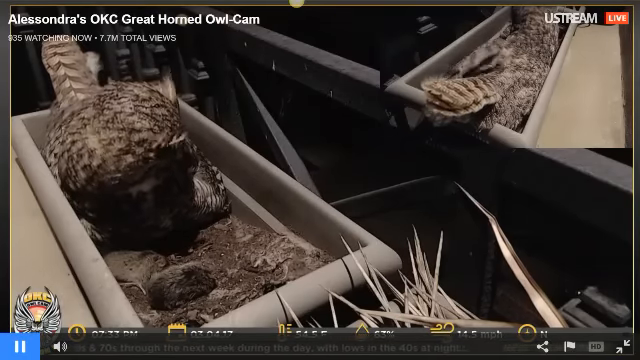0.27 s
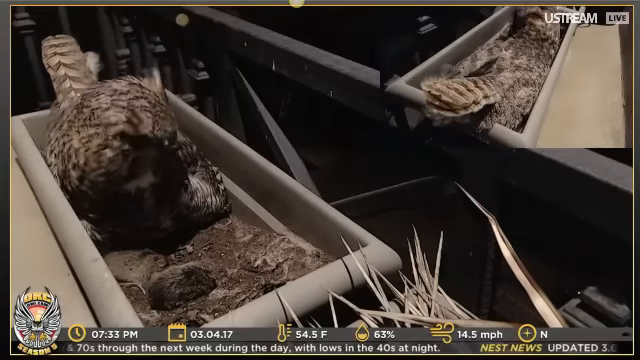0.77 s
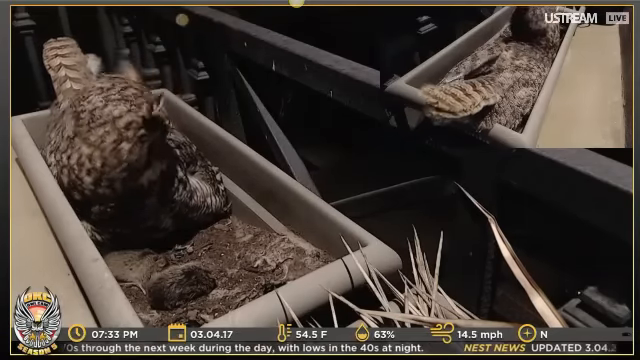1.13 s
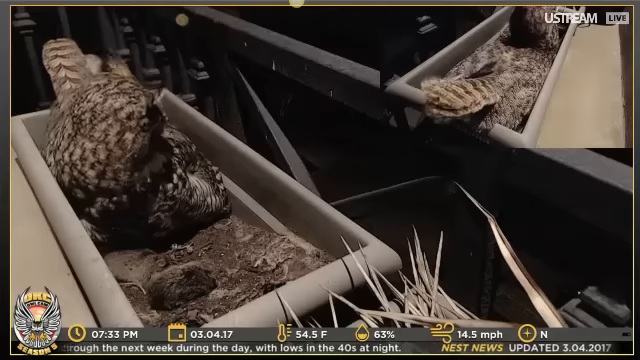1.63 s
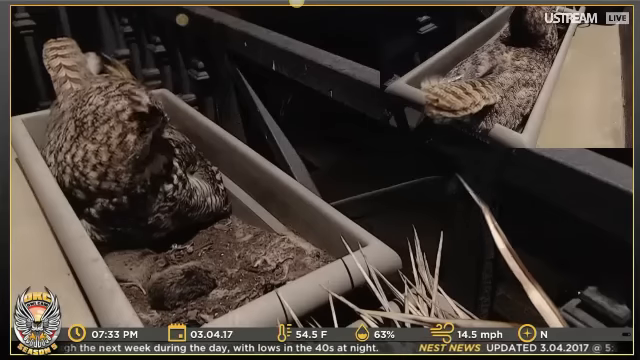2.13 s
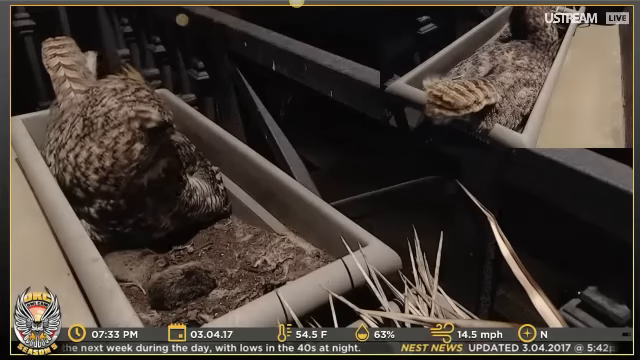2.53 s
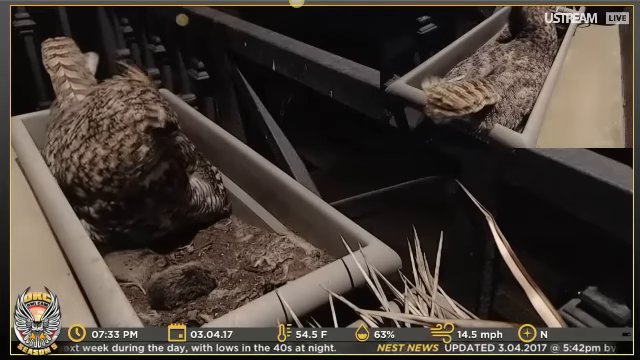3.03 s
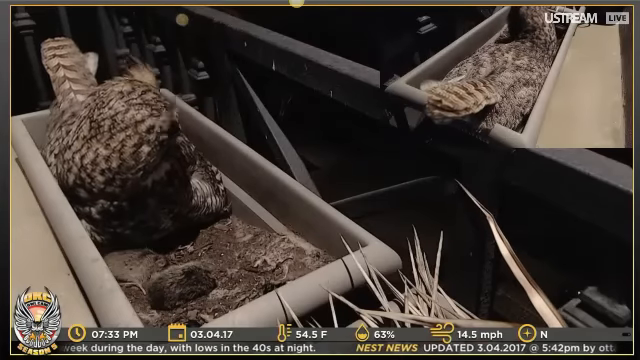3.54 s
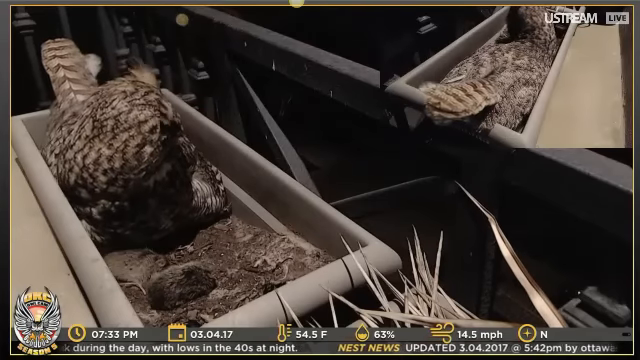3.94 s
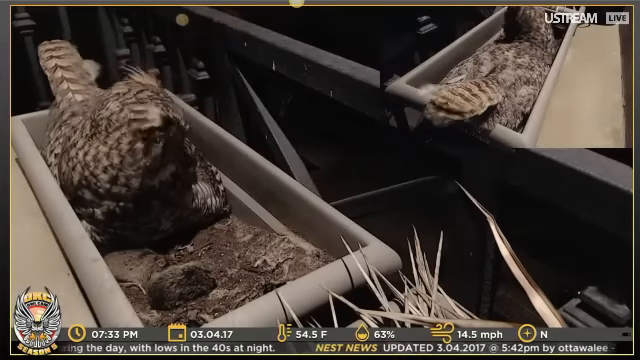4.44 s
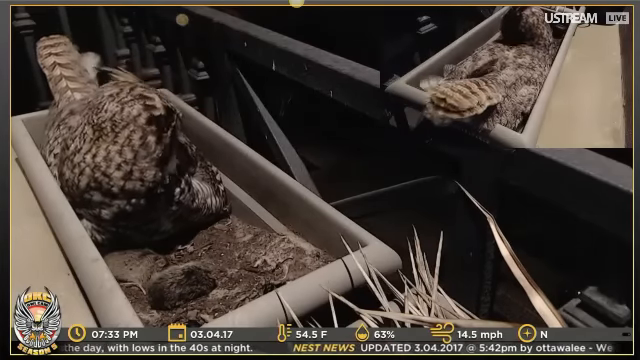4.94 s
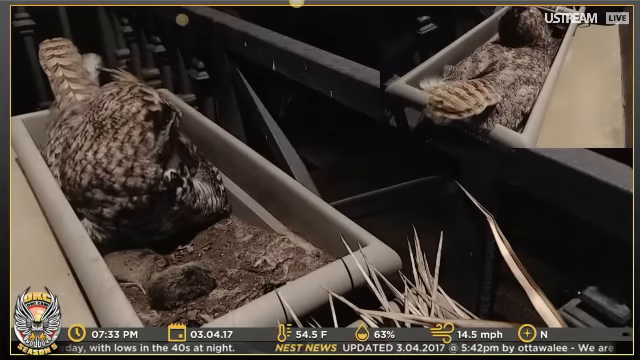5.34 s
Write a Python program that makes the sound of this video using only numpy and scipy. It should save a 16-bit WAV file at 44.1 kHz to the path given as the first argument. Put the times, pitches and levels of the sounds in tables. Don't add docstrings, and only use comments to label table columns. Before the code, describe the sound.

At night a large owl in a nest box gives three smooth low hoots, the first already sounding at the start. A faint far metallic squeal rings once after it. Dry litter snaps and scrapes after the third hoot, then short, throaty gulped hoots follow. Distant traffic rumbles and hisses throughout, and one car passes slightly nearer. Close stereo microphones give a thin, band-limited sound.

```python
import sys
import numpy as np
from scipy import signal
from scipy.fft import rfft, irfft, next_fast_len
from scipy.io import wavfile
from scipy.ndimage import uniform_filter1d

SR = 44100
rng = np.random.default_rng(int(sys.argv[2]) if len(sys.argv) > 2 else 0)


def store_wav(level_fs):
    pcm = np.round(np.clip(np.atleast_2d(level_fs), -1, 1) * 32767)
    wavfile.write(sys.argv[1], SR, pcm.T.astype(np.int16))


def voltage_ratio(decibels):
    exponent = np.asarray(decibels, float) / 20
    return 10 ** exponent


N = 246519


def rms_one(x):
    return x / np.sqrt(np.mean(x ** 2) + 1e-20)


def in_time(rows):
    s, *columns = np.transpose(rows)
    return [np.interp(np.arange(N) / SR, s, column) for column in columns]


def at_hz(points, hz):
    point_hz, value = np.transpose(points)
    return np.interp(np.log(hz + 1), np.log(point_hz), value)


def drift(rate_hz):
    r = np.exp(-80 * np.pi * rate_hz / SR)
    seed = rng.standard_normal(N // 40 + 2002)
    slow = signal.lfilter([1], [1, -2 * r, r * r], seed)[2000:]
    return np.interp(np.arange(N) / 40, np.arange(len(slow)), rms_one(slow - slow.mean()))


def resonate(x, hz, width_hz):
    r = np.exp(-np.pi * width_hz / SR)
    ring = [1, -2 * r * np.cos(2 * np.pi * hz / SR), r * r]
    return signal.lfilter(np.array([1, 0, -1]) * (1 - r * r) / 2, ring, x)


def narrow_noise(hz, width_hz):
    once = resonate(rng.standard_normal((2, N)), hz, width_hz)
    return rms_one(resonate(once, hz, width_hz))


def swell_db(start, held, rise_db_per_s, fall_db_per_s):
    t = np.arange(N) / SR
    return -rise_db_per_s * np.maximum(start - t, 0) - fall_db_per_s * np.maximum(t - start - held, 0)


def car_swell():
    passes_s, half_s = 3.72, 0.3
    return np.exp(-((np.arange(N) / SR - passes_s) / half_s) ** 2)


def place(x, lean_db, lead_s):
    late = np.interp(np.arange(N) - lead_s * SR, np.arange(N), x)
    return np.array([x * voltage_ratio(lean_db / 2), late * voltage_ratio(-lean_db / 2)])


def voice(hz, gain):
    waver, octave_db = 0.0091, -39
    phase = 2 * np.pi * np.cumsum(hz * (1 + waver * drift(24))) / SR
    return gain * (np.cos(phase) + voltage_ratio(octave_db) * np.cos(2 * phase))


def long_hoots():
    # start in seconds, end in seconds, top pitch in Hz, final sag in Hz.
    hoot_notes = [
        (-.045, 0.384, 288, 42),
        (1.229, 1.576, 285.1, 48),
        (1.91, 2.231, 290, 46),
    ]
    # time in seconds, level in dB.
    breath_curves = [
        [(0.0, -28.5), (0.034, -35), (0.208, -34.5), (0.32, -32), (0.372, -33), (0.395, -32)],
        [(1.222, -44), (1.238, -35.5), (1.256, -32.5), (1.314, -36), (1.506, -34.5), (1.558, -35.5),
         (1.582, -48)],
        [(1.905, -36), (1.929, -36), (2.083, -40.5), (2.139, -33), (2.183, -33.5), (2.23, -48)],
    ]
    swing_hz, swing_s = 42, 0.02
    creep_hz, creep_s = 8, 0.07
    sag_s, edge_s = 0.045, 0.013
    t, out = np.arange(N) / SR, np.zeros(N)
    for (start, end, top_hz, sag_hz), rows in zip(hoot_notes, breath_curves):
        since, left = np.maximum(t - start, 0), np.maximum(end - t, 0)
        hz = top_hz - swing_hz * np.exp(-since / swing_s) - creep_hz * np.exp(-since / creep_s)
        hz = hz - sag_hz * np.exp(-(left / sag_s) ** 1.46)
        level_db = uniform_filter1d(in_time(rows)[0], size=700)
        edges = np.clip(np.minimum(since, left) / edge_s, 0, 1)
        out += voice(hz, np.sqrt(2) * voltage_ratio(level_db) * edges)
    return out


def far_noise(spectrum, patchy_db, rate_hz):
    # frequency in Hz, left-right likeness from -1 to 1.
    likeness = [(100, 0.99), (280, 1), (480, 0.94), (850, 0.861), (1150, 0.41), (1500, 0.6), (2400, 0.403),
                (3100, 0.44), (4700, 0.085), (5700, 0.16), (6800, 0.81)]
    # frequency in Hz, left minus right in dB.
    level_lean = [(60, -6), (100, 2), (170, 1), (290, -0.5), (490, -2), (820, -3.5), (1390, -3),
                  (2350, -3.0), (3970, -1.0), (6710, 1)]
    # frequency in Hz, phase in radians by which the left port leads.
    phase_lead = [(0, 0), (860, 1.04), (1550, -1), (2070, -2.5), (3190, -0.54), (4310, 1), (5000, -6),
                  (5860, -2.5), (6890, -3.5)]
    size = next_fast_len(N)
    hz = np.arange(size // 2 + 1) * SR / size
    in_band = (hz > spectrum[0][0]) & (hz < spectrum[-1][0])
    mid, side = rfft(rng.standard_normal((2, size))) * voltage_ratio(at_hz(spectrum, hz)) * in_band
    alike, lean = np.clip(at_hz(likeness, hz), -1, 1), voltage_ratio(at_hz(level_lean, hz) / 2)
    common, opposed = np.sqrt(1 + alike) * mid, np.sqrt(1 - alike) * side
    lag = np.exp(-1j * np.interp(hz, *np.transpose(phase_lead)))
    pair = irfft([(common + opposed) * lean, (common - opposed) / lean * lag], size)[:, :N]
    pair = pair * voltage_ratio(patchy_db * drift(rate_hz))
    return pair / np.sqrt(np.mean(pair.mean(axis=0) ** 2))


def traffic():
    # time in seconds, level above its mean in dB.
    nearness = [(0.0, 2), (.6, 0.5), (1.5, -1.5), (2.3, .5), (2.7, -1.5), (3.15, -0.8), (3.75, 0.5),
                (4.4, 1.05), (4.95, -0.8), (5.25, 1.7), (5.59, 2.5)]
    # frequency in Hz, density in dB per Hz.
    rumble_colour = [(41, -64.5), (70, -35), (78, -24.5), (87, -10), (124, -0.5), (178, -4.5), (231, 1),
                     (262, -4.5), (286, -1), (312, -9), (343, -8.5), (400, -21.5), (520, -46.5),
                     (880, -120)]
    drone_colour = [(220, -42.5), (380, -2.5), (811, -14), (1060, -18), (1240, -24.5), (1500, -33.5),
                    (1950, -54), (3300, -120)]
    tyre_colour = [(820, -32), (1400, 0), (1590, -1.5), (2150, 1.5), (3570, -3.5), (4600, -13.5),
                   (5980, -34.5), (10100, -120)]
    top_colour = [(2590, -32), (4400, -2.5), (6470, -4.5), (7160, -10), (9310, -42.5), (15800, -120)]
    near_db, = in_time(nearness)
    road_db = near_db + 3.5 * car_swell()
    rumble = voltage_ratio(-45 + 0.1 * near_db) * far_noise(rumble_colour, 1.2, 2.5)
    drone = voltage_ratio(-58.5 + 0.47 * road_db) * far_noise(drone_colour, 1.0, 12.0)
    tyres = voltage_ratio(-73.5 + road_db) * far_noise(tyre_colour, 0.84, 6.0)
    top = voltage_ratio(-83.5 + 1.6 * near_db) * far_noise(top_colour, 1.8, 12.0)
    return rumble + drone + tyres + top


def squeals():
    # start in seconds, level in dB, frequency in Hz, length in seconds.
    faint_pips = [
        (.675, -80, 4350, .07),
        (.68, -86, 5950, .05),
        (.58, -83, 5000, .06),
    ]
    start_s, squeal_hz, beat_hz, flutter = 0.492, 3220, 27.5, 0.4
    age = np.arange(N) / SR - start_s
    second_mode = np.clip((age - 0.09) / 0.13, 0.15, 0.8)
    tone = np.sin(2 * np.pi * squeal_hz * age)
    tone = tone + second_mode * np.sin(2 * np.pi * (squeal_hz + beat_hz) * age + 2.9)
    level_db = -66 + swell_db(start_s, held=0.059, rise_db_per_s=900, fall_db_per_s=49)
    out = voltage_ratio(level_db) * (tone + flutter * narrow_noise(squeal_hz + 12, 50))
    for start, pip_db, hz, length in faint_pips:
        arch = np.sin(np.pi * np.clip((np.arange(N) / SR - start) / length, 0, 1))
        out += voltage_ratio(pip_db) * arch * narrow_noise(hz, 160)
    return out


def stem_snaps():
    # time in seconds, peak level in dB, ring frequency in Hz.
    snap_events = [(1.8647, -61, 5810), (2.099, -53, 6130), (2.1757, -54, 6400), (2.2042, -33, 6090),
                   (2.21, -43, 5760), (2.215, -48, 5900), (2.229, -42, 5750), (2.252, -48, 5840),
                   (2.2644, -50, 5420), (2.2964, -60.5, 5350), (2.313, -54, 4100), (2.3214, -41.5, 5610),
                   (2.349, -46.5, 6160), (2.4167, -47, 5530), (2.431, -54, 5560), (2.4932, -54, 6030),
                   (2.5376, -49, 5440), (2.6728, -56, 5710), (2.6875, -60, 5300), (2.6992, -51, 5460),
                   (2.704, -53, 4010), (2.7094, -56, 4020), (2.7174, -60, 5380), (2.7282, -51, 5670)]
    length, t60_s, ring_width_hz = 1500, 0.013, 1100
    break_click, tick_share = 15, 0.078
    out = np.zeros((2, N))
    for s, peak_db, hz in snap_events:
        seed = rng.standard_normal((2, length))
        i, lean_db = round(s * SR), -12.5 + 8 * seed[0, -1]
        burst = seed * voltage_ratio(-60 * np.arange(length) / SR / t60_s)
        burst[:, 0] = break_click
        burst = resonate(burst, hz, ring_width_hz) + tick_share * np.diff(burst, prepend=0)
        side_db = np.array([[lean_db / 2], [-lean_db / 2]])
        out[:, i:i + length] += burst / np.abs(burst).max() * voltage_ratio(peak_db + side_db)
    return out


def shuffling_feet():
    # start in seconds, time held in seconds, level in dB.
    foot_moves = [
        (2.15, .04, -82),
        (2.225, .05, -67),
        (2.3, 0.041, -61.5),
        (2.405, 0.02, -63),
        (2.45, .14, -72.5),
        (2.704, 0.021, -59),
        (4.59, .02, -74),
    ]
    # resonance in Hz, width in Hz, level in dB.
    stem_rings = [(5570, 420, -3), (4200, 510, -10), (6300, 900, -13.5), (2900, 900, -17)]
    born = rng.random((2, N)) < 2500 * voltage_ratio(3 * drift(60)) / SR
    size = voltage_ratio(3.8 * np.minimum(rng.exponential(1, (2, N)), 3))
    grains = born * size * rng.choice([-1, 1], (2, N))
    crackle = sum(voltage_ratio(db) * resonate(grains + 1e-18, hz, width_hz) for hz, width_hz, db in stem_rings)
    moving = sum(voltage_ratio(db + swell_db(s, held, 596.5, 897)) for s, held, db in foot_moves)
    return rms_one(crackle) * moving * voltage_ratio([[-2.5], [2.5]])


def litter():
    dry_litter = stem_snaps() + shuffling_feet()
    walls = signal.butter(4, 6400, fs=SR, output="sos")
    return signal.sosfilt(walls, dry_litter) + 0.22 * dry_litter


def short_hoots():
    # start in seconds, peak level in dB, pitch in Hz, length in seconds.
    hoot_pumps = [
        (3.456, -26.5, 240.4, 0.018),
        (3.86, -23, 268.7, 0.045),
        (4.229, -25, 264.2, 0.041),
        (4.532, -23, 266.7, 0.045),
        (4.838, -21.5, 273.4, 0.0503),
        (4.936, -27, 247, 0.028),
        (5.232, -22.5, 269.3, 0.049),
    ]
    # start in seconds, peak level in dB, pitch in Hz.
    slack_gulps = [
        (3.474, -37, 291.3),
        (3.497, -44, 199.7),
        (3.905, -38, 270.7),
        (4.271, -35, 257.6),
        (4.575, -32, 271.7),
        (4.65, -36, 199.4),
        (4.811, -37, 186.9),
        (4.969, -33.5, 187),
        (5.136, -38.5, 205.6),
        (5.281, -34.5, 195),
    ]
    pumps = [(*row, 0.11, -48) for row in hoot_pumps]
    pumps += [(*row, 0.025, 0.19, -52.5) for row in slack_gulps]
    t, hz, gain, puff = np.arange(N) / SR, np.full(N, 250.), np.zeros(N), np.zeros(N)
    for start, peak_db, pitch_hz, length, fall, puff_db in pumps:
        u = (t - start) / length
        on = (u > 0) & (u < 1)
        hz[on] = pitch_hz * (1 + fall * (0.4 - u[on] ** 1.4))
        gain[on] = voltage_ratio(peak_db) * np.sin(np.pi * u[on] ** 1.46) ** 0.6
        puff += voltage_ratio(puff_db) * np.exp(-((t - start - 0.88 * length) / 0.0099) ** 2)
    white = rng.standard_normal(N)
    throat_air = rms_one(resonate(resonate(white, 382, 100), 377, 110))
    chest_air = rms_one(resonate(resonate(white, 170, 90), 170, 90))
    tone = voice(uniform_filter1d(hz, size=120), uniform_filter1d(gain, size=120))
    return tone + puff * (throat_air + 0.33 * chest_air)


def passing_car():
    car_whoosh = (-76.5, 4000, 550)
    peak_db, hz, width_hz = car_whoosh
    return voltage_ratio(peak_db) * car_swell() * narrow_noise(hz, width_hz)


def scene():
    left_lead_s = 0.00012
    owl = place(long_hoots(), -0.38, left_lead_s) + place(short_hoots(), -1.0, left_lead_s)
    return owl + traffic() + squeals() + litter() + passing_car()


def band_limit(x):
    return signal.sosfilt(signal.butter(12, 15710, fs=SR, output="sos"), x)


def record(dry):
    run_in = 4096
    padded = np.concatenate([dry[:, run_in:0:-1], dry], axis=1)
    top_cut = signal.cheby2(12, 17, 7330, fs=SR, output="sos")
    low_cut = signal.butter(6, 96, "high", fs=SR, output="sos")
    cut = signal.sosfilt(np.vstack([top_cut, low_cut]), padded)[:, run_in:]
    hiss = rng.standard_normal((4, N))
    self_noise = voltage_ratio(-94.5) * (0.55 * hiss[0] * [[1], [-1]] + 1.3 * hiss[1:3])
    sub_band = signal.butter(2, 85, fs=SR, output="sos")
    sub_noise = voltage_ratio(-85.5) * rms_one(signal.sosfilt(sub_band, hiss[3]))
    return band_limit(cut + self_noise + sub_noise)


dry = scene()
out = record(dry)
store_wav(out)
```